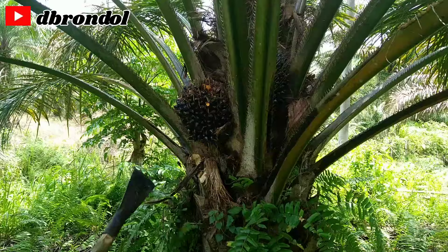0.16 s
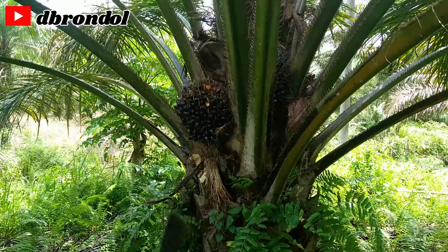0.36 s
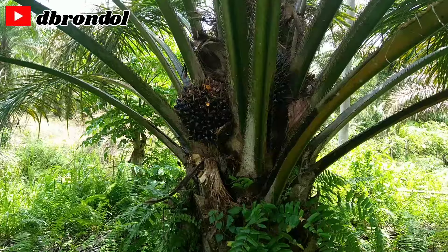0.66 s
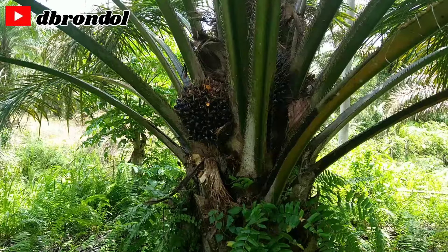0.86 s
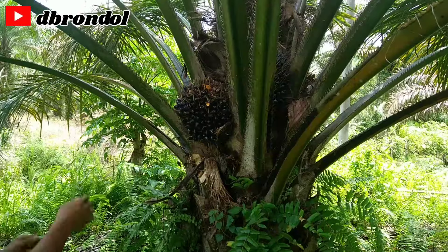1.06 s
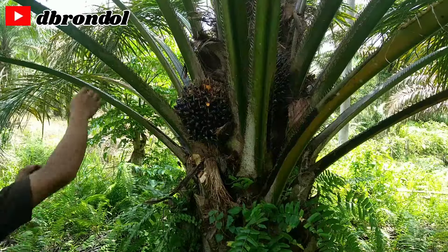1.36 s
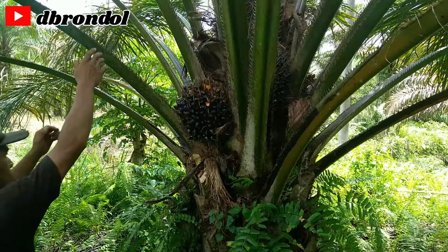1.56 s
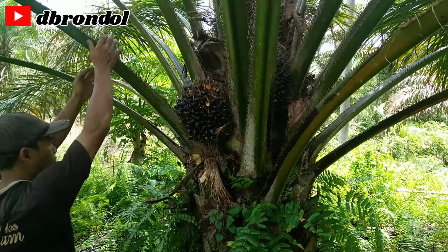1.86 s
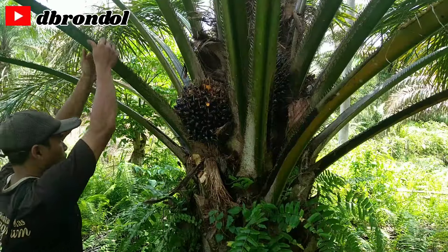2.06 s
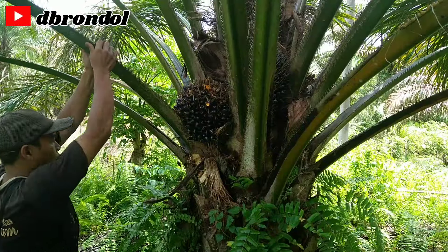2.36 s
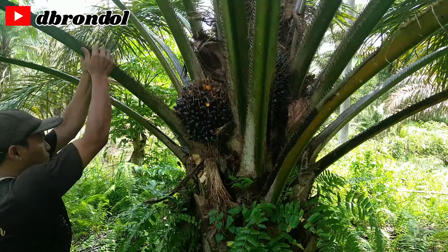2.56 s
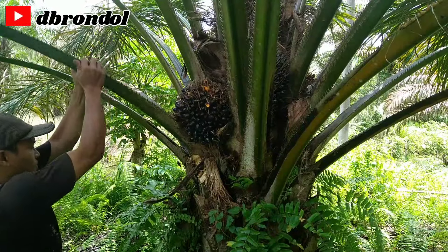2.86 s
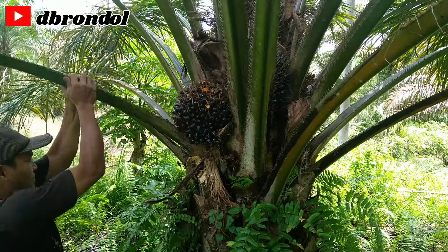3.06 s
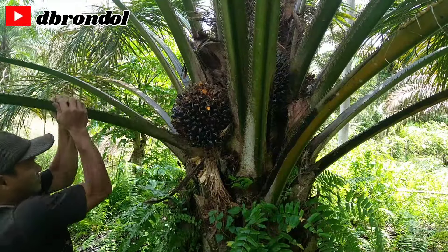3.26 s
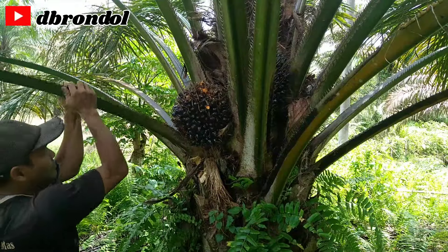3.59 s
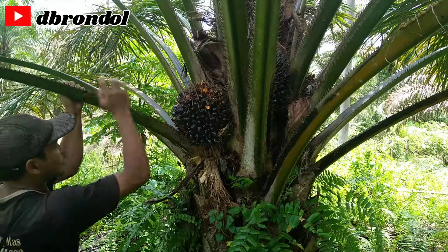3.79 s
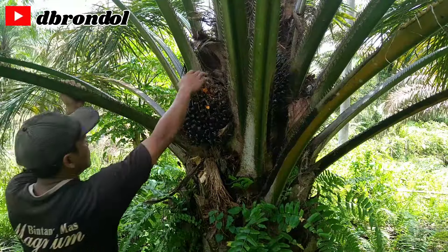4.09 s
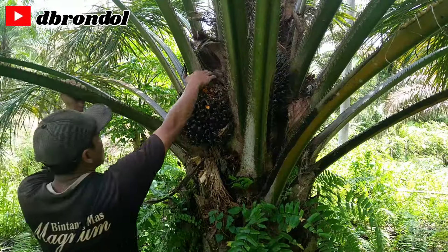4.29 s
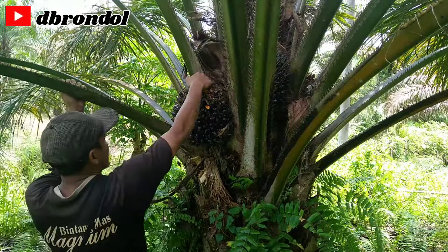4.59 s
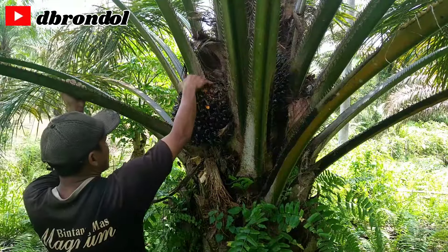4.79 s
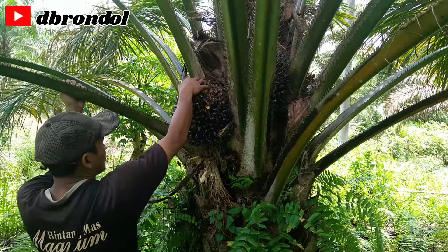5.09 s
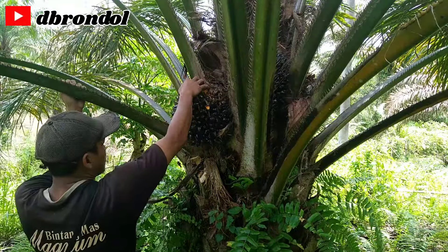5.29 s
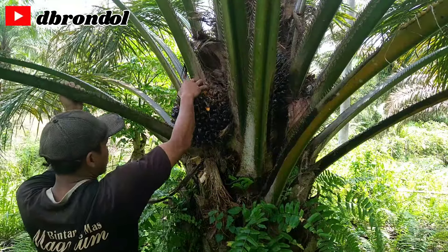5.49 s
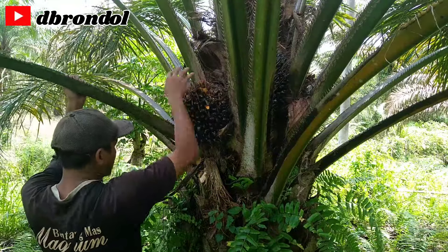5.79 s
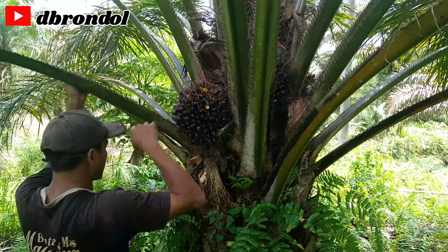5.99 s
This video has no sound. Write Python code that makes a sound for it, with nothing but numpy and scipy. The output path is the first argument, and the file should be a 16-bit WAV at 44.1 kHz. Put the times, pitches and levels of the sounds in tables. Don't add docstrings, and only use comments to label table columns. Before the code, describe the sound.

After a quiet half second of faint insect drone and distant whistling, a long-handled steel blade hits the ground: one loud, short metallic clank, then quick crunchy bounces and dull thumps. Leaves rustle softly as a palm frond is pulled down, with dry fibre snaps around three seconds and a hollow woody knock at four. Close stereo microphones outdoors, with slight low wind rumble.

```python
import sys
import numpy as np
from scipy import signal
from scipy.io import wavfile
from scipy.ndimage import uniform_filter1d

SR = 44100
rng = np.random.default_rng(int(sys.argv[2]) if len(sys.argv) > 2 else 0)


def wrap_up_sound(samples):
    columns = np.atleast_2d(samples).T
    tamed = np.clip(columns, -1, 1)
    steps = np.round(tamed * 32767).astype(np.int16)
    wavfile.write(sys.argv[1], SR, steps)


def linear_from_db(decibels):
    return 10 ** (np.asarray(decibels, float) / 20)


N = 270774

# [f/Hz, density/dB]
AIR = [(71, -38), (120, -3.5), (684, -10.5), (1210, -39.5), (1940, -6.5), (3110, -13), (5190, -8),
       (5990, -17.5), (7050, -10), (8140, -11), (11100, -35), (14400, -30), (16000, -57)]
AIR_DB = -60.5
# [f/Hz, likeness/1]
ALIKE = [(60, 0.59), (250, 0.658), (700, 0.78), (2000, 0.33), (6000, 0.14), (15000, 0.068)]
# [t/s, level/dB]
WIND = [(0.0, -59.5), (0.41, -55.5), (0.67, -54), (0.7, -39), (0.73, -48), (1.67, -41), (1.85, -50.5),
        (2.89, -57.5), (2.94, -45.5), (3.18, -55), (3.32, -50.5), (3.52, -58), (4.6, -49), (4.67, -42),
        (4.92, -57.5), (5.04, -45.5), (5.11, -54.5), (6.14, -55.5)]
# [f/Hz, density/dB]
GUST = [(7.1, -17), (12, 6), (30, 6.5), (54, -8), (115, -18), (156, -37), (200, -21.5), (260, -51),
        (440, -120)]
LEE_DB, VEER_DB = -7, 4.5
# [f/Hz, width/Hz, level/dB]
TYMBAL = [(7000, 96, -11), (7004, 366, 10), (7220, 360, -0.5), (14300, 800, -20)]
DRONE_DB, DRONE_SWAY_DB = -55.5, 1.6
# [share of the note/1, f/Hz]
HELD = [(0, 2930), (.3, 2980), (1, 2883)]
CHIP = [(0, 3120), (.4, 3470), (1, 3420)]
SCOOP = [(0, 2900), (.2, 2800), (.55, 2868), (.8, 3250), (1, 3700)]
PEEP = [(0, 7900), (.5, 7950), (1, 7840)]
# [contour, its notes [t/s, length/s, level/dB]]
SONG = [
    (HELD, [(.05, .14, -61.5), (.215, 0.31, -59.5), (3.82, .24, -61.5)]),
    (CHIP, [(2.315, 0.064, -63), (4.385, .05, -64), (5.488, .055, -62.5)]),
    (SCOOP, [(2.37, .16, -61.5), (4.43, 0.19, -62.5), (5.545, .19, -63.5)]),
    (PEEP, [(5.255, 0.033, -61)]),
]
THIN_DB = -19
# [f/Hz, density/dB]
RUSTLE = [(530, -40.5), (900, -8.5), (989, -38), (1060, -19.5), (1340, -16), (1540, -12), (2240, -8),
          (3620, 1), (6790, -4), (11000, -28), (14300, -42.5), (22000, -120)]
# [f/Hz, density/dB]
STALKS = [(41, -38.5), (70, 0), (150, -5), (232, -12.5), (292, -3), (384, -3), (1350, -10), (2200, -8.5),
          (2860, -14), (4840, -120)]
# [f/Hz, density/dB]
CRISP = [(4410, -30.5), (7500, -5), (12100, -21), (15200, -18), (16200, -22), (16300, -21.5),
         (16500, -70.5)]
# [peak t/s, length/s, rustle level/dB, stalk re rustle/dB, crispness re rustle/dB]
MOVES = [(0.0, 0.9, -57, -11, -6.5), (0.454, 0.15, -47, -25, -2), (0.54, 0.19, -49.5, -2.5, -7),
         (0.699, 0.12, -40, -7, -6), (0.799, 0.1, -38, -1.5, -5), (0.9, .15, -44.5, -3.5, -5.5),
         (1.246, 0.53, -53.5, -11.5, -4.5), (1.378, 0.69, -57.5, -21, -17), (1.515, 0.3, -49.5, -4.5, -8),
         (1.9, 0.56, -65, -8, -4), (2.547, 0.15, -65.5, -15, -6), (2.821, 0.19, -58, -3, -3.5),
         (3.022, 0.21, -51, -10, -9), (3.26, 0.29, -47.5, -2, -9), (3.417, 0.53, -49, -3.5, -10),
         (3.543, 0.51, -44.5, -6.5, -16), (3.64, 0.26, -52.5, 0.5, -4.5), (3.99, 0.69, -58, -2.5, -13),
         (4.482, 0.71, -60.5, -11, -15), (5.305, 1, -76, -8, -13), (5.758, 0.17, -59, -15, -7),
         (5.957, 0.49, -56, -6, -9), (6.02, 0.058, -52, -12, -2), (6.14, 0.39, -58.5, -19, -18)]
# [rustle level/dB, stalk level/dB, crispness level/dB]
STILL_DB = (-69.5, -72.5, -82.5)
RISE_SHARE, EDGE_DB = 0.46, -8
# [t/s, peak level/dB, f/Hz]
TICKS = [(.6542, -19, 8500), (2.295, -44, 5200), (2.628, -33, 4300), (2.669, -35, 4000), (2.792, -37, 4200),
         (2.8175, -23, 3800), (2.833, -31, 3500), (3.012, -36, 4000), (3.049, -29, 4400),
         (3.057, -29, 4000), (5.18, -30, 5000), (5.314, -43, 4200), (5.331, -52, 1800), (5.366, -46, 4000),
         (5.405, -46, 3400), (5.499, -36, 5600), (5.536, -47, 3000), (6.02, -45, 5500)]
# [t/s, peak level/dB, f/Hz, ring/cycles]
THUMPS = [(0.656, -27, 340, 1.4), (.659, -25.5, 650, 6.9), (.672, -30, 206, 3.4), (0.684, -22, 181, 0.55),
          (0.702, -50, 223, 3.3), (0.719, -43, 288, 3.5), (.838, -29.5, 203, 1.6), (.865, -37.5, 230, 3.1),
          (.904, -24.5, 226, 1.5), (.935, -33.5, 239, 3.8), (.947, -30, 333, 1.8), (1.674, -50, 430, 2.3),
          (2.816, -43.5, 500, 0.83), (3.178, -27, 1430, 1.1), (3.305, -38.5, 278, 0.6),
          (3.42, -42.5, 158, 1.6), (3.429, -45, 285, 5.1), (4.0668, -20.5, 1333, 4.3),
          (4.0668, -35, 1530, 5), (4.073, -37, 804, 4), (4.068, -37, 1920, 28), (4.067, -44, 4410, 39),
          (4.067, -33.5, 992, 7.3), (4.067, -33.5, 547, 1.4), (4.067, -31, 753, 3.1),
          (4.075, -56.5, 201, 1.6), (5.983, -50.5, 344, 2)]
# [t/s, peak level/dB, crack f/Hz, knock f/Hz, knock re crack/dB]
SNAPS = [(.019, -38, 2660, 770, -15), (1.395, -54.5, 2500, 704, 2.5), (1.495, -42, 1800, 1460, -16),
         (1.532, -41, 4000, 726, -8.5), (1.672, -45, 1690, 850, -2.5), (2.5035, -28, 4300, 564, -26.5),
         (2.629, -37.5, 4440, 468, -44), (2.669, -38.5, 4370, 664, -24), (2.8075, -30.5, 3220, 1120, -42),
         (2.812, -27.5, 4160, 777, -19), (3.1772, -32, 7000, 1480, -27), (3.1795, -17.5, 4950, 599, -16.5),
         (3.238, -37, 2960, 784, -12), (3.295, -33, 1970, 930, -10), (3.300, -27, 2950, 548, -20),
         (3.775, -42.5, 3000, 420, -3.5), (3.803, -48.5, 2470, 730, 2.5), (4.0665, -33.5, 4000, 1770, -8),
         (4.118, -45.5, 2170, 750, -8), (4.335, -51.5, 2230, 720, -11), (5.18, -37.5, 4370, 423, -37),
         (6.017, -39.5, 6450, 1150, -20), (6.027, -48, 7360, 565, -32)]
# [t/s, peak level/dB, crack f/Hz, knock f/Hz, knock re crack/dB]
BOUNCES = [(.6530, -24.5, 4400, 950, -31), (.6548, -14.5, 2050, 913, -8.5), (.745, -19.5, 2860, 516, -9.5),
           (.761, -17, 2460, 467, -13), (.797, -20, 2090, 540, -20), (.8025, -20.5, 4200, 530, -11),
           (.807, -19.5, 3100, 600, -8), (.812, -31, 5500, 520, -21), (.837, -16.5, 2270, 304, -7.5),
           (.849, -30, 2200, 437, 4), (.902, -13, 2530, 439, -13.5), (.9205, -20.5, 3260, 420, -3.5),
           (.927, -34.5, 1820, 534, 7.5)]
SNAP_S, BOUNCE_S = 0.0036, .006
# [t/s, peak level/dB]
CLANGS = [
    (0.6546, 9.5),
    (0.7456, -11),
    (0.7627, -14),
    (0.8046, -19),
]
# [f/Hz, level/dB, 60 dB decay time/s]
BLADE = [(2790, -15, .04), (3585, -3, .045), (3690, 5, .016), (5090, -5, .022), (6330, -5, .022),
         (6475, -9, .07), (7550, -15, .02), (8780, -15, .04)]


def evened(x):
    return x / np.sqrt(np.mean(x ** 2) + 1e-20)


def read(points, hz):
    f, value = np.transpose(points)
    return np.interp(np.log(hz + 1), np.log(f + 1), value)


def curves(rows):
    s, *columns = np.transpose(rows)
    return [np.interp(np.arange(N) / SR, s, c) for c in columns]


def add(mix, s, sound):
    part = mix[round(s * SR):][:len(sound)]
    part += sound[:len(part)]


def resonate(x, hz, width):
    centre = np.clip(hz, 20, SR / 2.2)
    quality = max(hz / width, .3)
    return signal.lfilter(*signal.iirpeak(centre, quality, SR), x)


def slow(size):
    noise = uniform_filter1d(rng.standard_normal((2, N)), size)
    return evened(uniform_filter1d(noise, size))


def coloured(x, spectrum, lag=0, patchy_db=0, size=512):
    hz, t, z = signal.stft(x, SR, nperseg=size, noverlap=size * 3 // 4)
    patches = uniform_filter1d(rng.standard_normal(z.shape[1:]), 6, 0)
    patches = evened(uniform_filter1d(patches, 16, 1))
    same = np.clip(read(ALIKE, hz), 0, 1)[:, None] * (lag != 0)
    shift = np.exp(2j * np.pi * hz * lag / SR)[:, None]
    right = same * z[0] * shift + np.sqrt(1 - same ** 2) * z[1]
    gain = linear_from_db(read(spectrum, hz)[:, None] + patchy_db * patches)
    z = np.array([z[0], right]) * gain
    return evened(signal.istft(z, SR, nperseg=size, noverlap=size * 3 // 4)[1][:, :N])


def grove(x, lag, scatter_db, t60):
    t = np.arange(6000) / SR
    sparse = rng.random((2, len(t))) < .08
    taps = rng.standard_normal((2, len(t))) * sparse * linear_from_db(-60 * t / t60) * (t > .0006)
    taps = signal.lfilter([1, -1], [1, -.9], taps)
    taps *= linear_from_db(scatter_db) / np.linalg.norm(taps, axis=1, keepdims=True)
    direct = np.array([np.roll(x, round(lag)), x])
    return direct + signal.fftconvolve(x[None], taps, axes=1)[:, :N]


def dull(x, hz, edge_db):
    return signal.sosfilt(signal.butter(3, hz, fs=SR, output="sos"), x) + linear_from_db(edge_db) * x


def far_foliage():
    return linear_from_db(AIR_DB) * coloured(rng.standard_normal((2, N)), AIR, lag=7.1, patchy_db=4.8, size=1024)


def wind():
    level_db = curves(WIND)[0]
    pan_db = LEE_DB + VEER_DB * slow(size=2500)[0]
    lumps = rng.standard_normal((2, N)) * linear_from_db(3.2 * slow(size=1200))
    return linear_from_db(level_db + 2.5 + np.outer([.5, -.5], pan_db)) * coloured(lumps, GUST, size=2048)


def cicadas():
    out = np.zeros((2, N))
    for side in range(2):
        for per_s in (81.0, 120.5, 158, 230):
            turns = np.cumsum(per_s * (1 + 0.034 * slow(size=2000)[0])) / SR
            buzz = (.5 + np.exp(-(turns % 1) / .3)) * rng.standard_normal(N)
            for hz, width, db in TYMBAL:
                once = resonate(buzz, hz, 1.3 * width)
                out[side] += linear_from_db(db) * resonate(once, hz, 1.3 * width)
    sway_db = DRONE_SWAY_DB * slow(size=9000)[0]
    return linear_from_db(DRONE_DB + sway_db + np.array([[1.5], [-1.5]])) * evened(out)


def bird():
    out = np.zeros(N)
    waver, flutter = slow(size=160)
    for shape, notes in SONG:
        for s, length, db in notes:
            share = np.arange(0, 1, 1 / (length * SR))
            pitch = np.interp(share, *np.transpose(shape))
            pitch = pitch * (1 + .006 * waver[round(s * SR):][:len(share)])
            tone = np.sin(2 * np.pi * np.cumsum(pitch) / SR) * signal.windows.tukey(len(share), .2)
            thinning_db = THIN_DB * (pitch / pitch[0] - 1)
            add(out, s, linear_from_db(db + 2.5 + thinning_db) * tone)
    return out * linear_from_db(2.2 * flutter)


def movement():
    t = np.arange(N) / SR
    power = linear_from_db(np.array(STILL_DB))[:, None] ** 2
    for s, length, db, stalk_db, crisp_db in MOVES:
        away = np.maximum((s - t) / RISE_SHARE, (t - s) / (1 - RISE_SHARE)) / length
        peak = linear_from_db(db + np.array([[0], [stalk_db], [crisp_db]]))
        power = power + peak ** 2 * linear_from_db(2 * EDGE_DB * away ** 1.12)
    return 10 * np.log10(power)


def leaves():
    rustle_db, stalk_db, crisp_db = movement()
    clumps = linear_from_db(1.6 * slow(size=300)[0])
    ticks = rng.standard_normal((2, N)) * linear_from_db(1.6 * rng.exponential(1, (2, N)))
    ticks *= rng.random((2, N)) < .05
    drive = (rng.standard_normal((2, N)) + .6 * evened(ticks + ticks[::-1])) * clumps
    rustle = linear_from_db(rustle_db) * coloured(drive, RUSTLE, lag=18.4, patchy_db=0.0)
    crisp = linear_from_db(crisp_db) * coloured(drive, CRISP, patchy_db=0.5)
    stalks = linear_from_db(stalk_db) * coloured(drive, STALKS, lag=14.0, patchy_db=4.0, size=1024)
    return rustle + crisp + stalks


def knock(hz, cycles, t):
    turns = hz * (t + 0.00037 * (1 - np.exp(-t / 0.0028)))
    ring = np.sin(2 * np.pi * turns) * np.exp(-t * hz / cycles) * (1 - np.exp(-t / 0.00018))
    return ring / abs(ring).max()


def ticks_and_thumps():
    out, t = np.zeros(N), np.arange(3000) / SR
    for (s, db, hz), noise in zip(TICKS, rng.standard_normal((len(TICKS), len(t)))):
        tick = (t == 0) + .15 * noise * np.exp(-t / .002)
        tick = resonate(resonate(tick, hz, 1.3 * hz), hz, 1.3 * hz) + .16 * tick
        add(out, s, linear_from_db(db) * tick / abs(tick).max())
    for s, db, hz, cycles in THUMPS:
        add(out, s, linear_from_db(db) * knock(hz, cycles, t))
    return out


def hits(rows, length, knock_cycles, width, tail_db):
    out, t = np.zeros(N), np.arange(3000) / SR
    chance = rng.standard_normal((len(rows), 2, len(t)))
    for (s, db, crack_hz, knock_hz, knock_db), (sign, size) in zip(rows, chance):
        fade = np.exp(-t / (0.5 * length)) + linear_from_db(tail_db) * np.exp(-t / (4.8 * length))
        main_break = 4.0 * (t == t[8])
        breaks = (sign * linear_from_db(4.0 * size) + main_break) * fade * (1 - np.exp(-t / .0002))
        crack = resonate(breaks, crack_hz, width * crack_hz)
        crack = resonate(crack, crack_hz, width * crack_hz) + 0.13 * breaks
        rattle = resonate(breaks, 2.0 * knock_hz, 1.1 * knock_hz)
        wood = knock(knock_hz, knock_cycles, t) + 0.72 * rattle / abs(rattle).max()
        add(out, s, linear_from_db(db) * (crack / abs(crack).max() + linear_from_db(knock_db) * wood))
    return out


def frond():
    snaps = hits(SNAPS, SNAP_S, knock_cycles=4.4, width=1.84, tail_db=-8.5)
    return dull(snaps, 11200, edge_db=-3.5) + dull(ticks_and_thumps(), 8000, edge_db=-6.0)


def blade():
    out, t = np.zeros(N), np.arange(4000) / SR
    grip = .2 + .8 * np.exp(-(t / .0042) ** 4)
    blow = 1 - np.exp(-(t / 0.0019) ** 2)
    for (s, db), phases in zip(CLANGS, rng.random((len(CLANGS), len(BLADE)))):
        ring = np.zeros(len(t))
        for (hz, mode_db, t60), phase in zip(BLADE, phases):
            ring += linear_from_db(mode_db - 60 * t / t60) * np.sin(2 * np.pi * (hz * t + phase))
        add(out, s - .001, linear_from_db(db - 11.0) * ring * grip * blow)
    return out


def dropped_tool():
    bounces = hits(BOUNCES, BOUNCE_S, knock_cycles=2.14, width=2.96, tail_db=-22)
    return dull(bounces, 6500, edge_db=-14) + blade()


def scene():
    background = far_foliage() + wind() + cicadas()
    far = grove(bird(), lag=-3, scatter_db=-9, t60=.15)
    near = linear_from_db([[-.8], [.8]]) * grove(frond(), lag=2, scatter_db=-9, t60=.05)
    near += grove(dropped_tool(), lag=-1, scatter_db=-9, t60=.06)
    return background + far + leaves() + near


def roll_off(x):
    return signal.sosfilt(signal.butter(12, 17000, fs=SR, output="sos"), x)


def record(dry):
    lowpass = signal.firwin(511, 15830, window=("kaiser", 9), fs=SR)
    limited = signal.oaconvolve(dry, lowpass[None], "same")
    return roll_off(limited)


dry = scene()
out = record(dry)
wrap_up_sound(out)
```